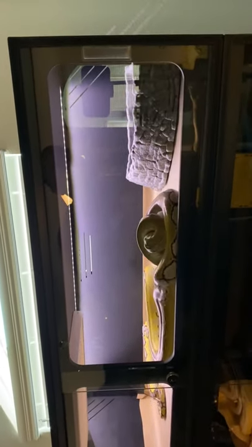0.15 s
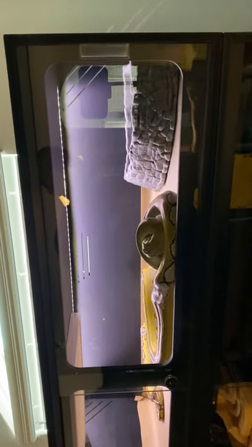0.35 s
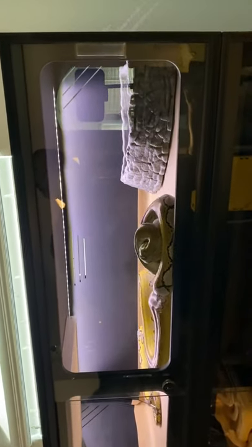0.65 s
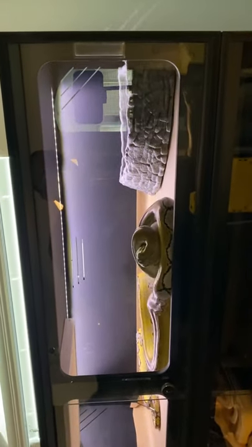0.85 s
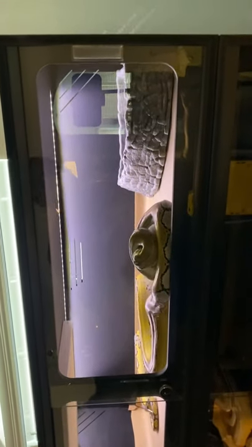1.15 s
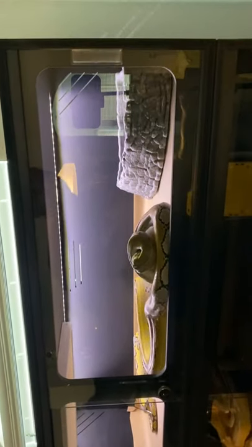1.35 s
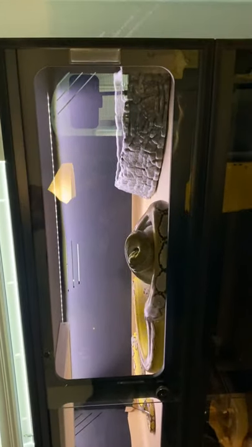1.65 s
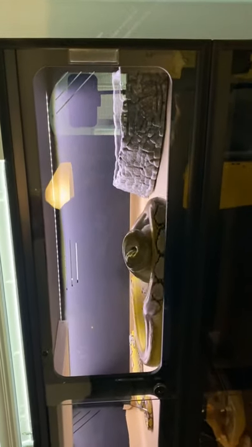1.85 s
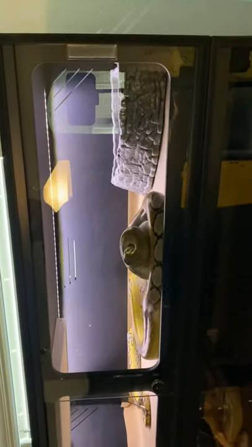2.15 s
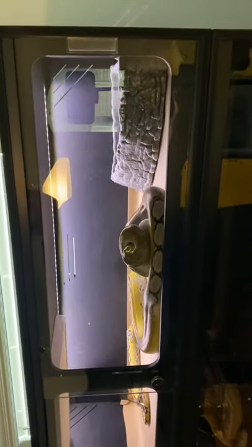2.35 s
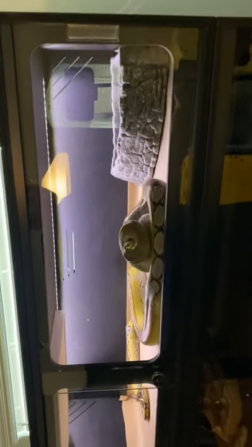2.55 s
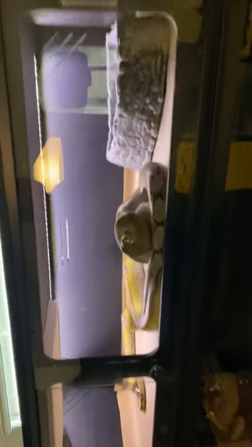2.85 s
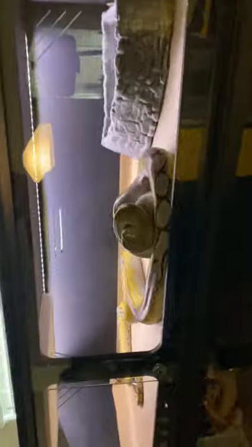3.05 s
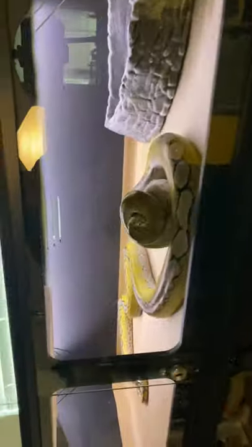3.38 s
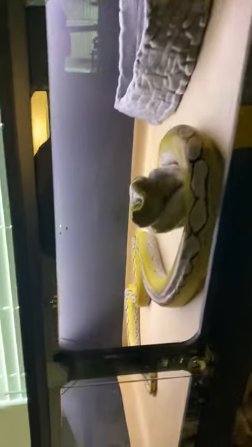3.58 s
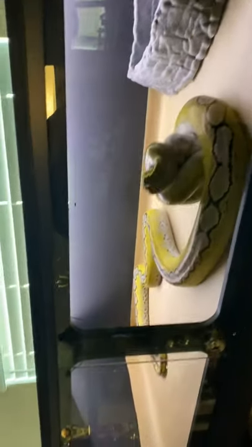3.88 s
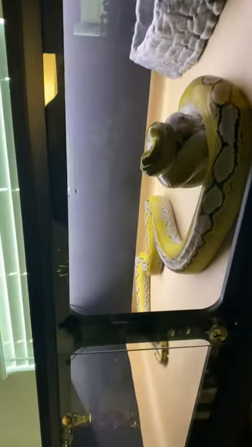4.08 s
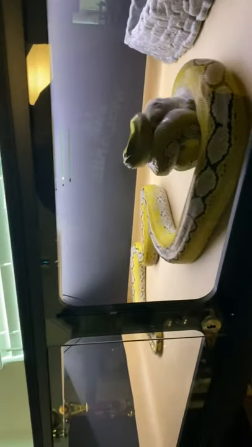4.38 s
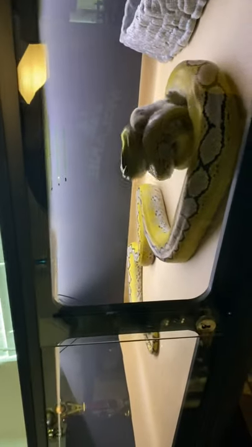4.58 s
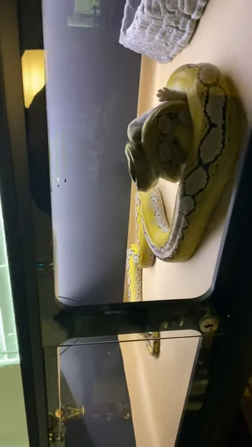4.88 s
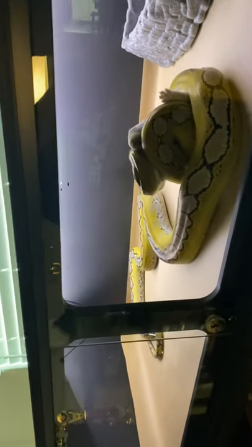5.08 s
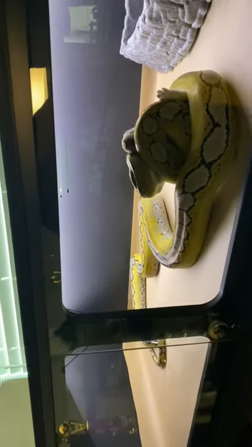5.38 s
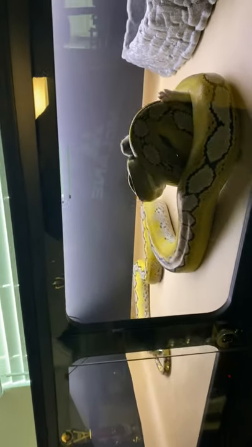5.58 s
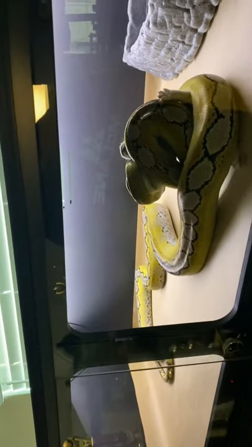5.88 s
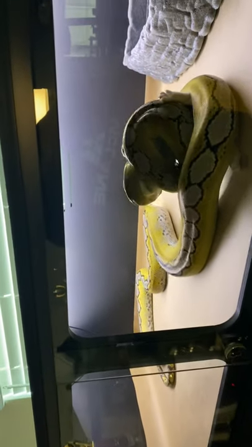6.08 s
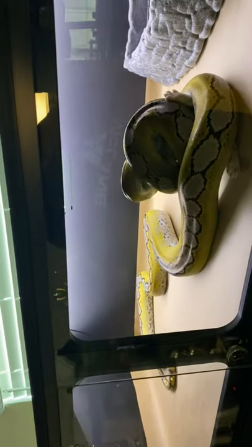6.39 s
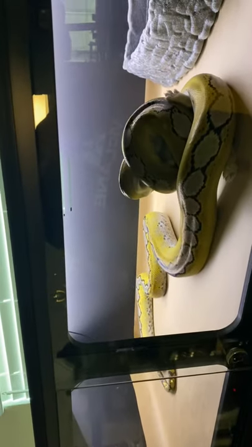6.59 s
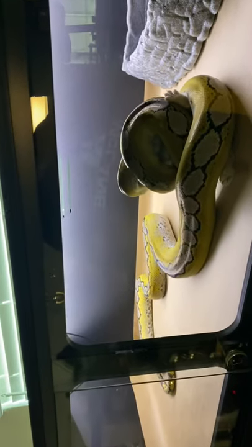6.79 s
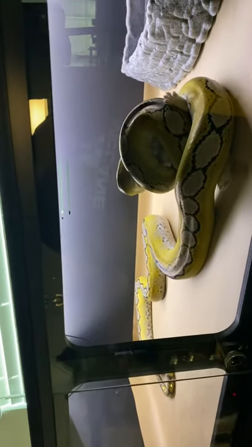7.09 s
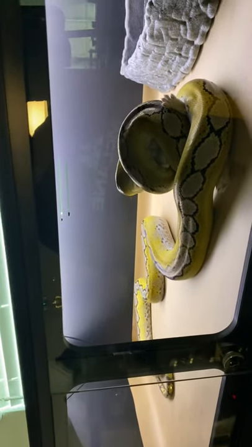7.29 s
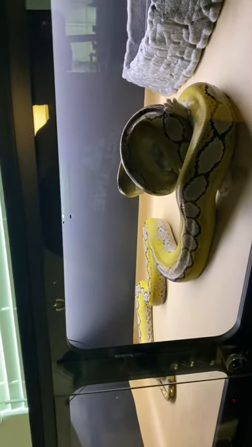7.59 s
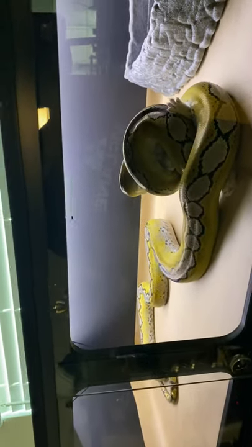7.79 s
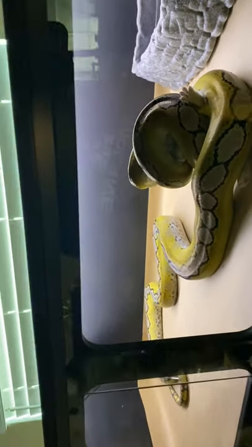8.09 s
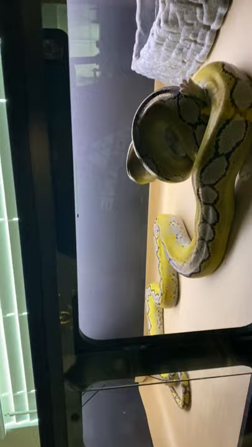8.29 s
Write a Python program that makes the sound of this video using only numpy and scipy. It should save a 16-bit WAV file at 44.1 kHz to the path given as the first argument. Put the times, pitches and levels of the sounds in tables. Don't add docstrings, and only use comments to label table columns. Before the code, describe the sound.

A small animal is already screaming at the start, shrill and near, inside a glass-fronted box. Thirteen cries follow one another roughly every 0.4 to 0.5 seconds until about 5.5 seconds, each a third of a second or less, rising quickly, cracking and sagging. The earliest is highest; later ones are lower, hoarser and breathier. At 5.7 seconds the voice is gone and a strong bright hissing wheeze bursts out and fades; a lower, falling wheeze follows from 6.5 to about 7.3. A dry snap comes at 7.3, then a faint breath and small rising creak at 7.6 to 7.9. The sharpest snap hits at 8.2, another at 8.4. Underneath, appliances rumble faintly, someone shuffles, and feet thump, with knocks near 1.25, 2.7 and 7.5 seconds. The box rings tightly and the room echoes briefly in stereo.

```python
import sys
import numpy as np
from scipy import signal
from scipy.fft import rfft, irfft
from scipy.io import wavfile

SR = 44100
rng = np.random.default_rng(int(sys.argv[2]) if len(sys.argv) > 2 else 0)


def generate_wav(sig):
    pcm = np.round(np.clip(np.atleast_2d(sig).T, -1, 1) * 32767).astype(np.int16)
    wavfile.write(sys.argv[1], SR, pcm)


def invert_db(level):
    return 10 ** (np.asarray(level, dtype=float) / 20)


N = 372248


def in_time(tables, edge_s):
    t = np.arange(N) / SR
    rows = np.concatenate(tables)
    gate = 0
    for table in tables:
        first, last = table[0][0], table[-1][0]
        corners = [first - edge_s, first + edge_s, last, last + 4 * edge_s]
        gate = gate + np.interp(t, corners, [0, 1, 1, 0])
    return [gate] + [np.interp(t, rows[:, 0], column) for column in rows[:, 1:].T]


def per_event(starts, table):
    row = np.searchsorted(starts, np.arange(N) / SR, side="right") - 1
    return np.transpose(table)[:, np.maximum(row, 0)]


def at_hz(points):
    hz = np.maximum(np.arange(N // 2 + 1) * SR / N, 1)
    points = np.array(points)
    return np.interp(np.log(hz), np.log(points[:, 0]), points[:, 1])


def colour(x, points):
    return irfft(rfft(x) * invert_db(at_hz(points)), N)


def rms_one(x):
    return x / np.sqrt(np.mean(x ** 2) + 1e-20)


def drift(rate_hz):
    r = np.exp(-2 * np.pi * rate_hz / SR)
    wander = signal.lfilter([1], [1, -2 * r, r * r], rng.standard_normal(N + SR))
    return rms_one(wander[SR:])


def shelf(x, gain_db, hz, kind):
    part = signal.sosfilt(signal.butter(3, hz, kind, fs=SR, output="sos"), x)
    return x + (invert_db(gain_db) - 1) * part


def whistle(centre_hz, width_hz):
    low_pass = signal.butter(2, width_hz / 2, fs=SR, output="sos")
    slow = signal.sosfilt(low_pass, rng.standard_normal((2, N)))
    turns = np.cumsum(centre_hz) / SR
    return rms_one(slow[0] * np.sin(2 * np.pi * turns) + slow[1] * np.cos(2 * np.pi * turns))


# (f/Hz, likeness from -1 to 1)
LIKENESS = [(60, .999), (150, .88), (300, .4), (520, 0), (750, -.3), (1800, .6), (3500, .2), (6000, 0),
            (7600, -.4), (8500, -.9), (11500, -.9), (13000, -.3), (15500, .3)]


def spread(mid, side):
    alike = np.clip(at_hz(LIKENESS), -1, 1)
    shared = rfft(mid) * np.sqrt(1 + alike)
    opposed = rfft(side) * np.sqrt(1 - alike)
    return irfft(shared + opposed * [[1], [-1]], N)


# (f/Hz, level/dB per Hz)
HUM = [(12, -27.5), (20, -16), (64, -0.5), (118, -14), (151, -13), (217, -20), (347, -23), (511, -28),
       (700, -41.5), (1100, -42), (2000, -47), (4000, -58), (9000, -53), (15000, -76)]
# (f/Hz, width/Hz, level/dB)
MOTOR = [(146.3, 2.2, -68.5), (341, 11, -78.5)]
# (t/s, level/dB)
SHUFFLE = [
    (0.0, -47),
    (0.25, -55.5),
    (0.52, -75.5),
    (1.1, -60.5),
    (1.86, -55.5),
    (3.4, -50.5),
    (4.09, -70.5),
    (4.47, -56.5),
    (6.0, -67),
    (8.44, -68),
]


def background():
    white = rng.standard_normal((5, N))
    rumble = spread(colour(white[0], HUM), colour(white[1], HUM))
    hum = invert_db(-59.5) * rms_one(rumble)
    for hz, width_hz, level_db in MOTOR:
        r = np.exp(-np.pi * width_hz / SR)
        ringing = [1, -2 * r * np.cos(2 * np.pi * hz / SR), r * r]
        hum += invert_db(level_db) * rms_one(signal.lfilter([1], ringing, white[2]))
    rustle = signal.sosfilt(signal.butter(2, [350, 1000], "band", fs=SR, output="sos"), white[3:])
    shuffle_db = in_time([SHUFFLE], edge_s=.01)[1] - 13.0 + 3.0 * drift(11)
    return hum + rms_one(spread(*rustle)) * invert_db(shuffle_db)


# (t/s, peak level/dB, f/Hz)
THUMPS = [
    (0.432, -65, 92),
    (0.719, -74, 137),
    (1.253, -48.5, 204),
    (2.521, -65, 77.5),
    (2.663, -48, 90),
    (3.855, -64, 76),
    (6.514, -71, 151.2),
    (7.48, -57.5, 102.6),
]


def thumps():
    out = np.zeros(N)
    t = np.arange(SR // 8) / SR
    for s, peak_db, hz in THUMPS:
        i = round(s * SR)
        out[i:i + len(t)] += invert_db(peak_db) * np.sin(2 * np.pi * hz * t) * np.exp(-t * hz / 2.48)
    return out


# (t/s, peak level/dB, f/Hz)
TICKS = [
    (7.3433, -49, 2740),
    (8.1844, -72, 4660),
    (8.2065, -41, 4180),
    (8.2107, -56, 4160),
    (8.428, -51, 4800),
]


def ticks():
    out = np.zeros(N)
    for s, peak_db, hz in TICKS:
        i = round(s * SR)
        t = np.arange(min(SR // 20, N - i)) / SR
        burst = rng.standard_normal(len(t)) * np.exp(-t / .002)
        body = signal.sosfilt(signal.butter(1, [hz * .8, hz * 1.2], "band", fs=SR, output="sos"), burst)
        edge = signal.sosfilt(signal.butter(2, 900, "high", fs=SR, output="sos"), burst)
        out[i:i + len(t)] += invert_db(peak_db + 3.0) * (body + invert_db(-3) * edge)
    return out


def tail(x, t60_s):
    t = np.arange(SR // 2) / SR
    white = rng.standard_normal(len(t)) * invert_db(-60 * t / t60_s) * (t > .003)
    dull = signal.sosfilt(signal.butter(1, 5000, fs=SR, output="sos"), white)
    echoes = dull + (white - dull) * invert_db(-25 * t / t60_s)
    return signal.fftconvolve(x, echoes / np.sqrt(np.sum(echoes ** 2)))[:N]


# (t/s, throat f/Hz, level/dB)
GRUNT = [
    (7.61, 1884, -54),
    (7.654, 2160, -67),
    (7.676, 2158, -43.5),
    (7.758, 2390, -49.5),
    (7.834, 2200, -82),
    (7.88, 2220, -70.5),
]


def grunt():
    gate, throat_hz, level_db = in_time([GRUNT], edge_s=0.0069)
    return whistle(throat_hz, width_hz=680) * invert_db(3.4 * drift(60)) * gate * invert_db(level_db - 14.0)


# (t/s, air level/dB, main mouth resonance f/Hz)
WHEEZES = [
    [(5.745, -53.5, 5340), (5.775, -46.5, 5560), (5.821, -40, 5605), (5.935, -51.5, 5630),
     (5.98, -56, 5560), (6.131, -62.5, 5600), (6.32, -55.5, 5600), (6.43, -93, 5300)],
    [(6.535, -54.5, 5040), (6.663, -43, 4670), (6.729, -44, 4610), (6.815, -51, 4580), (7.025, -54, 5100),
     (7.165, -63, 4260), (7.3, -65.5, 3230), (7.4, -105, 3300)],
    [(7.61, -98, 3287), (7.63, -73.5, 3320), (7.684, -60.5, 3260), (7.746, -62, 3250), (7.9, -100, 3250)],
]
# (brightness level/dB, open-throat level/dB)
WHEEZE_TONE = [(0, -13), (0, -15), (10, -2.5)]
# (f/Hz, level/dB per Hz)
HISS = [(600, -36), (1300, -22), (2500, -12), (4000, -4), (5200, 0), (7000, -3), (9000, -3), (10300, -8),
        (12000, -14), (15000, -19), (16000, -24)]
# (f/Hz, width/Hz, level/dB)
WINDPIPE = [(2131, 266, -19), (3325, 270, -16.5)]


def wheezes():
    gate, air_db, mouth_hz = in_time(WHEEZES, edge_s=0.018)
    bright_db, open_db = per_event([wheeze[0][0] for wheeze in WHEEZES], WHEEZE_TONE)
    rough_noise = rng.standard_normal(N) * invert_db(5.3 * drift(170))
    air = rms_one(colour(rough_noise, HISS))
    air += invert_db(-5) * whistle(mouth_hz, width_hz=1270)
    for hz, width_hz, level_db in WINDPIPE:
        air += invert_db(level_db) * whistle(np.full(N, hz), width_hz)
    air *= gate * invert_db(air_db + 0.5)
    air = shelf(air, bright_db, 7800, "high")
    return shelf(air, open_db + 15.0, [1400, 3200], "band")


# (start t/s, length t/s, effort level/dB, swell from the onset level/dB, brightness level/dB)
SCREAMS = [(-.1, .32, -33.5, 1, 2), (0.372, .27, -34.5, 4, 2), (.79, 0.28, -33, 6, 3.5),
           (1.229, .24, -33.5, 6, 6), (1.625, .24, -36, 1.5, 4), (2.039, 0.29, -38, 1, 6),
           (2.488, 0.33, -36.5, 7, 6.5), (2.99, 0.36, -36, 9, 4.5), (3.499, .26, -34, 4.5, 6),
           (3.929, 0.36, -35, 5.5, 3), (4.482, 0.28, -38.5, 6.5, 2.5), (4.958, .22, -35.5, 14.5, 3.5),
           (5.371, 0.16, -37, 4, 3)]
# (climbs to f/Hz, climb t/s, voice breaks after t/s, then settles at f/Hz, end sag f/Hz)
PITCH = [(1996, .02, .02, 2010, 700), (1651.5, .04, .25, 1640, 260), (1692, .045, .14, 1830, 550),
         (1707, .042, .165, 1600, 300), (1620, .05, .12, 1560, 350), (1401, .03, .11, 1430, 220),
         (1326, .04, .15, 1340, 40), (1345, .05, .17, 1430, 30), (1302, 0.022, .1, 1375, 220),
         (1497, .065, .13, 1460, 86), (1334, 0.044, .14, 1480, 170), (1370, .05, .12, 1410, 29),
         (1201, 0.036, .06, 1370, 24)]
# (half-pitch lines level/dB, pitch jitter/%)
HOARSE = [(-6, 5.5), (-25, .7), (-12, 2.5), (-22, .9), (-8, 1.6), (-1, .6), (-1, .5), (-3, 2.5), (-6, 2.2),
          (-4, 1.8), (-5, 3), (-5, 3.5), (-6, 4.5)]
# (voice over air before break level/dB, after break level/dB,
#                  main mouth resonance f/Hz, open-throat level/dB)
THROAT = [(-0.5, 5.5, 4200, 1.5), (6, 4.5, 4500, -3), (9, 7, 4950, 1.5), (8.5, 15.5, 4800, -3),
          (1.5, 2.5, 4650, -6), (7, 8, 4750, -0.5), (10, 6, 5250, -2), (0.5, 0.5, 5050, 1),
          (3, 0.5, 5050, 9), (5.5, -2.5, 4700, 4), (10, 0.5, 3700, -1), (10.5, -3, 4450, 2.5),
          (6.5, -2, 4900, 8.5)]


def cry_controls():
    starts = [cry[0] for cry in SCREAMS]
    start, length, top_db, swell_db, bright_db = per_event(starts, SCREAMS)
    climb_hz, climb_s, break_s, settle_hz, sag_hz = per_event(starts, PITCH)
    hoarse_half_db, hoarse_jitter = per_event(starts, HOARSE)
    before_db, after_db, mouth_hz, open_db = per_event(starts, THROAT)
    age = np.arange(N) / SR - start
    over = np.maximum(age - length, 0)
    broken = 1 - np.exp(-np.maximum(age - break_s, 0) / .015)

    climb = climb_hz * (1 - (1 - .58) * np.exp(-age / climb_s))
    sag = np.clip(1 + (age - length) / .07, 0, 1.3) ** 2
    pitch_hz = climb + broken * (settle_hz - climb_hz) - sag * sag_hz
    thin_db = 90 * np.minimum(pitch_hz / climb_hz - 0.93, 0)

    swell = swell_db * np.exp(-age / (0.34 * length))
    release = 33.5 * (1 - np.exp(-over / 0.072))
    effort_db = top_db - swell - release
    gate = np.clip(age / .008, 0, 1) * np.clip(6 - over / .03, 0, 1)

    bright_db = bright_db + 12.5 * np.exp(-age / 0.045) - 61 * over
    mouth_hz = mouth_hz - 898.4 * np.exp(-age / .05)
    clear_db = before_db + broken * (after_db - before_db)

    steady_half_db, steady_share = -22, .22
    half_db = steady_half_db + broken * (hoarse_half_db - steady_half_db)
    jitter = .5 + hoarse_jitter * (steady_share + broken * (1 - steady_share)) - .5 * broken
    return gate, pitch_hz, effort_db, clear_db, bright_db, open_db, mouth_hz, thin_db, half_db, jitter


# (f/Hz, level/dB per Hz)
MOUTH = [(600, -44), (1300, -23), (1700, -27), (2200, -28), (2700, -8), (3400, -5), (4200, -7), (5100, 0),
         (6400, -3), (8500, -7), (10500, -18), (13000, -19), (16000, -26)]
# (f/Hz, level/dB per Hz)
AIR = [(600, -41), (1300, -20), (2150, -23.5), (2700, -9.5), (3600, -6.5), (5000, 2), (6500, 5.5),
       (8800, -26.5), (10500, -13.5), (13000, -8), (15000, -5.5), (16000, -42.5)]


def screams():
    controls = cry_controls()
    gate, pitch_hz, effort_db, clear_db, bright_db, open_db, mouth_hz, thin_db, half_db, jitter = controls
    wobble = 1 + .005 * drift(30) + jitter / 100 * drift(300)
    turns = np.cumsum(pitch_hz * wobble) / SR
    uneven = invert_db(half_db) * np.sin(np.pi * turns)

    lines = 0
    for k in range(1, 13):
        line_hz = k * pitch_hz
        near_mouth_db = 6.5 * np.exp(-((line_hz - mouth_hz) / 650) ** 2)
        level_db = near_mouth_db + 3.0 * drift(14) + thin_db * (k == 1)
        line = np.sin(2 * np.pi * k * turns + k * k) * (line_hz < 17000)
        lines = lines + line * invert_db(level_db) * (1 + uneven * (k > 2))
    lines *= invert_db(2.0 * drift(200))

    voice_over_air_db = clear_db + 1.2 * np.minimum(effort_db + 46, 0)
    clear = 1 / (1 + invert_db(-voice_over_air_db) ** 2)
    voice = colour(lines * gate * np.sqrt(clear) * invert_db(effort_db - 1.0), MOUTH)

    chopped = 1 + .7 * np.sin(2 * np.pi * turns)
    air = rng.standard_normal(N) * chopped * invert_db(2.5 * drift(250))
    air = rms_one(colour(air, AIR)) + invert_db(-5) * whistle(mouth_hz, width_hz=1250)
    air *= gate * np.sqrt(1 - clear) * invert_db(effort_db - 2.0)
    air = shelf(air, open_db, [1300, 2600], "band")
    return shelf(voice + air, np.clip(bright_db, -9, 9), 7500, "high")


def scene():
    snaps = ticks()
    animal = screams() + wheezes() + grunt()
    animal += invert_db(-4.5) * snaps
    boxed = animal + snaps + invert_db(0.5) * tail(animal, t60_s=0.071)
    lag_s = 5.6e-5
    hz = np.arange(N // 2 + 1) * SR / N
    late = irfft(rfft(boxed) * np.exp(-2j * np.pi * hz * lag_s), N)
    room = spread(tail(animal, t60_s=0.34), tail(animal, t60_s=0.34))
    return np.array([boxed, late]) + invert_db(1) * room + background() + thumps()


def drop_faint_bands(mid, side, margin_db, top_margin_db, masked_db):
    hz, _, pair = signal.stft([mid, side], SR, nperseg=2048)
    band = (np.log(1 + hz / 2500) * 24).astype(int)
    first_bins = np.unique(band, return_index=True)[1]
    power = np.add.reduceat(np.abs(pair) ** 2, first_bins, axis=1) / np.bincount(band)[:, None]
    chance = invert_db(rng.normal(0, 5, power.shape))
    power = power[:, band] * chance[:, band]

    mid_margin_db = np.where(hz > 11700, top_margin_db, margin_db)
    margin = invert_db([-mid_margin_db, -margin_db + 0 * hz])[..., None] ** 2
    loudest = power[:, hz > 1500].max(axis=(0, 1))
    kept = (power > power[::-1] * margin) | (hz < 900)[:, None]
    kept &= (power > loudest * invert_db(-masked_db) ** 2) | (hz < 400)[:, None]
    kept[0, (hz > 8400) & (hz < 11700)] = False
    kept = kept * (hz < 15850)[:, None]
    return signal.istft(pair * kept, SR, nperseg=2048)[1][:, :N]


def roll_off(x):
    return signal.sosfilt(signal.butter(12, 16560, fs=SR, output="sos"), x)


def record(dry):
    mid, side = (dry[0] + dry[1]) / 2, (dry[0] - dry[1]) / 2
    t = np.arange(N) / SR
    onset = sum(np.exp(-((t - cry[0]) / .012) ** 2) for cry in SCREAMS)
    lean = drop_faint_bands(mid, side, margin_db=8, top_margin_db=1.2, masked_db=43)
    mid, side = lean + .9 * onset * ([mid, side] - lean)
    return roll_off(np.array([mid + side, mid - side]))


dry = scene()
out = record(dry)
generate_wav(out)
```